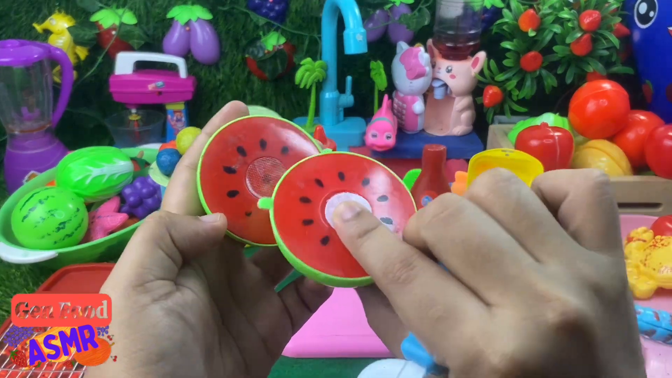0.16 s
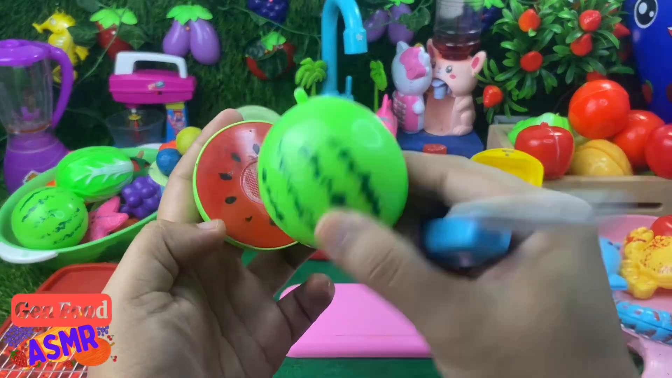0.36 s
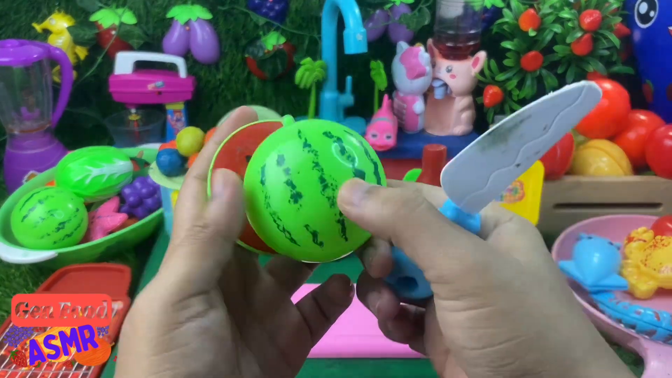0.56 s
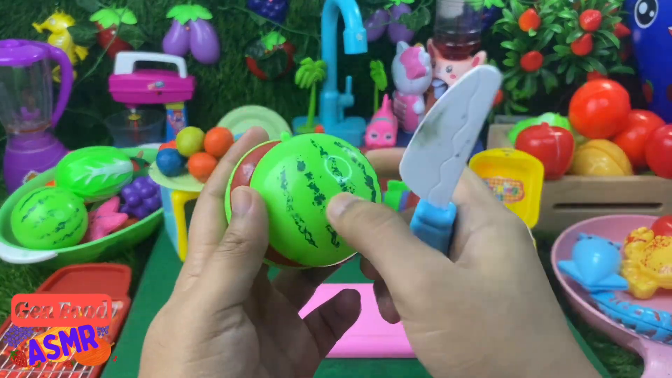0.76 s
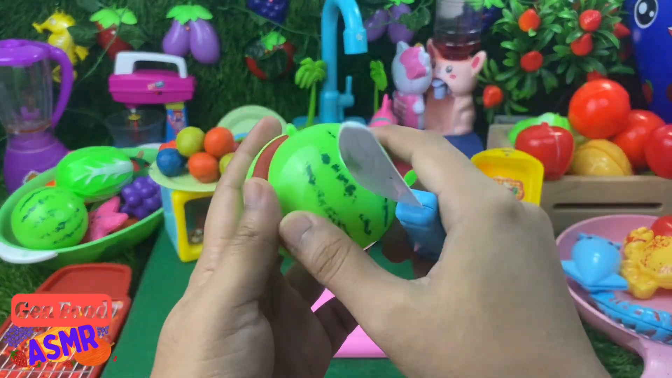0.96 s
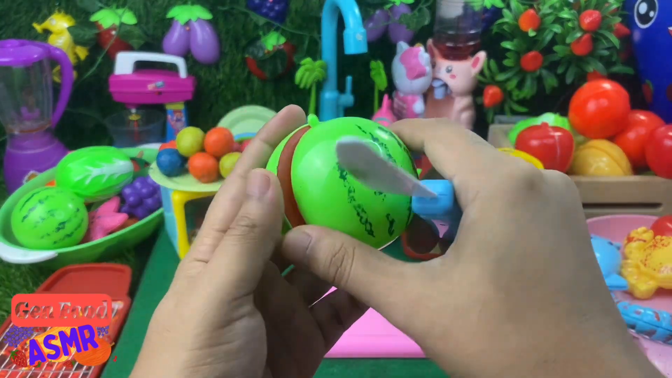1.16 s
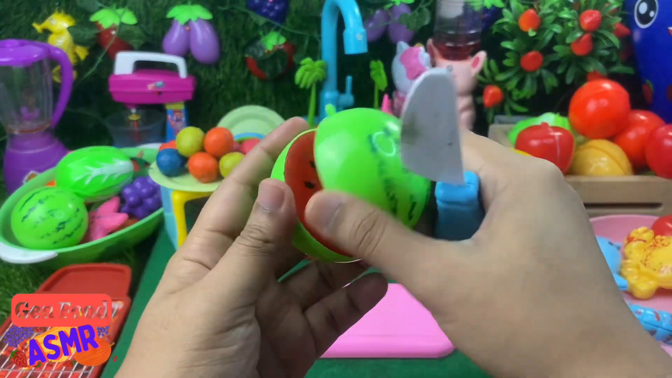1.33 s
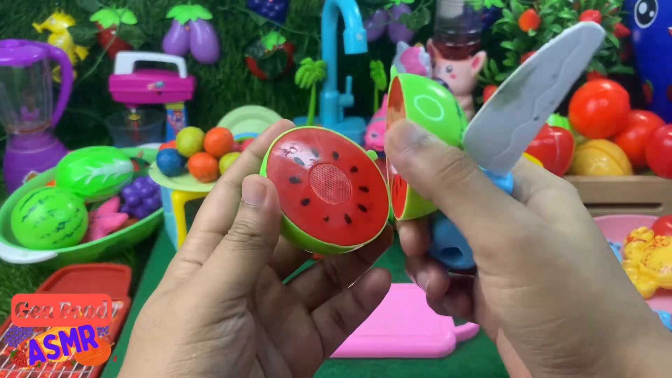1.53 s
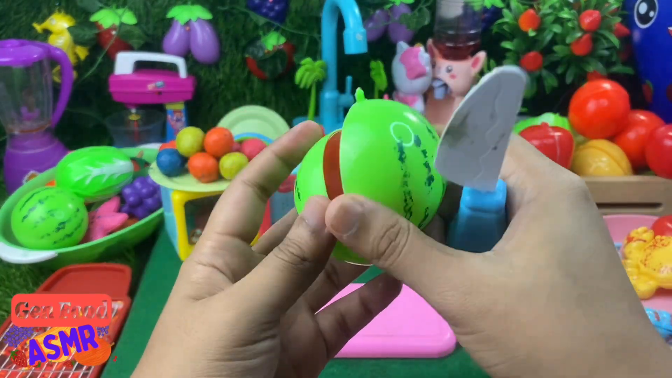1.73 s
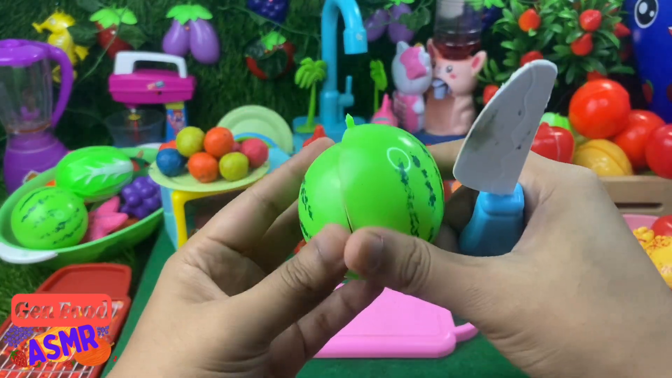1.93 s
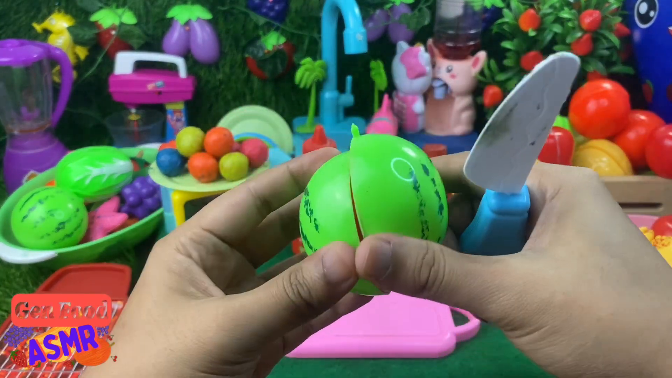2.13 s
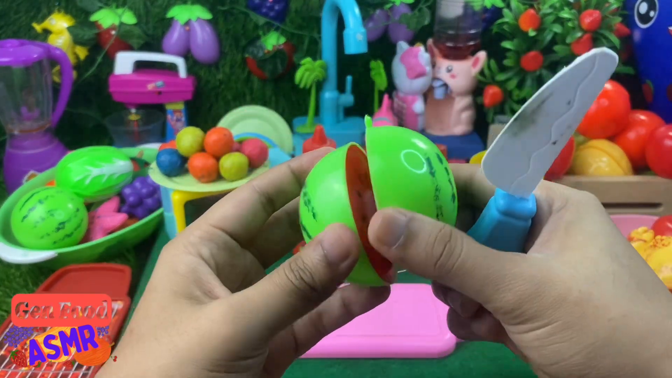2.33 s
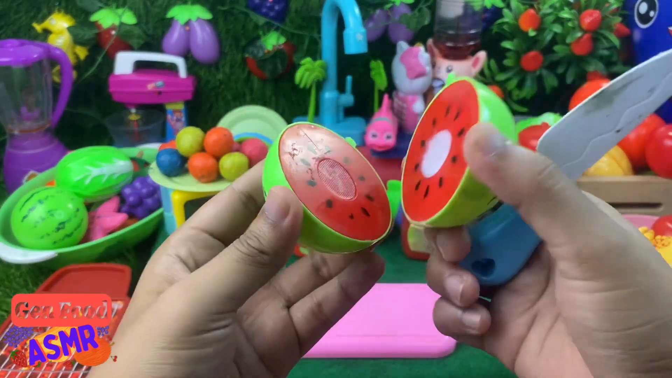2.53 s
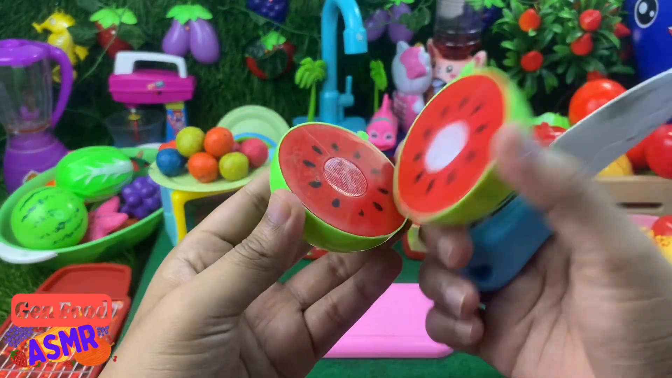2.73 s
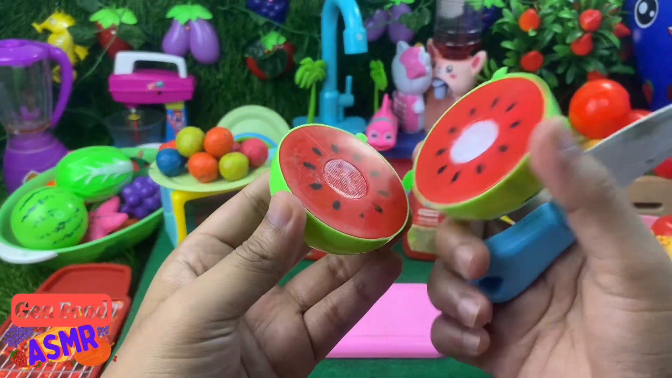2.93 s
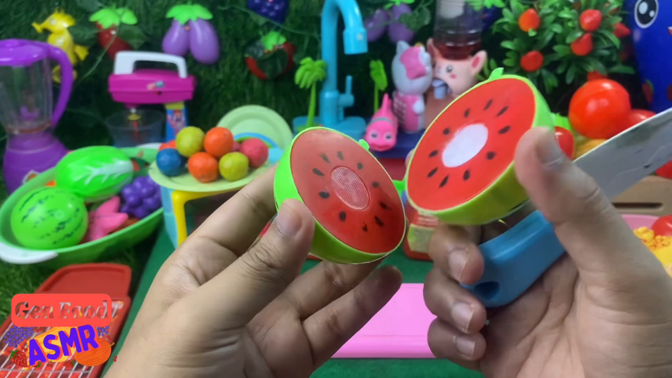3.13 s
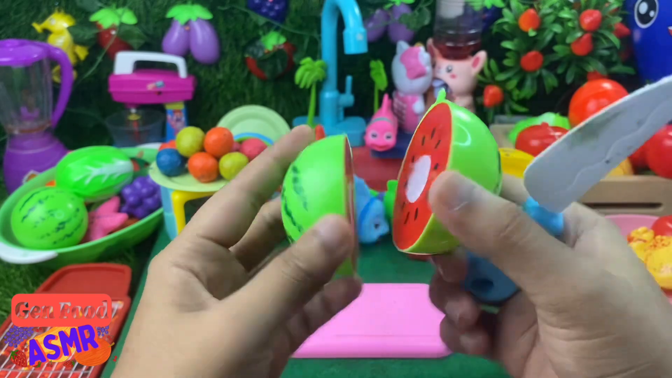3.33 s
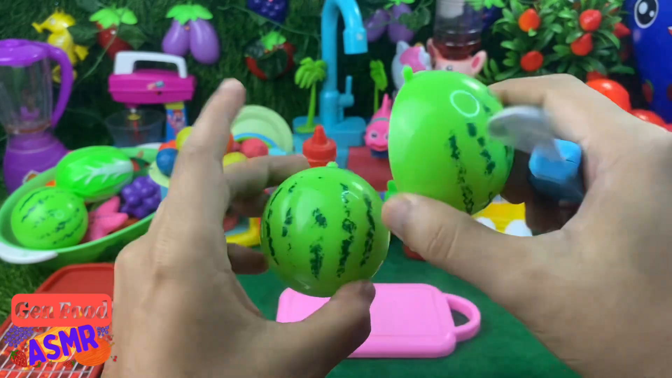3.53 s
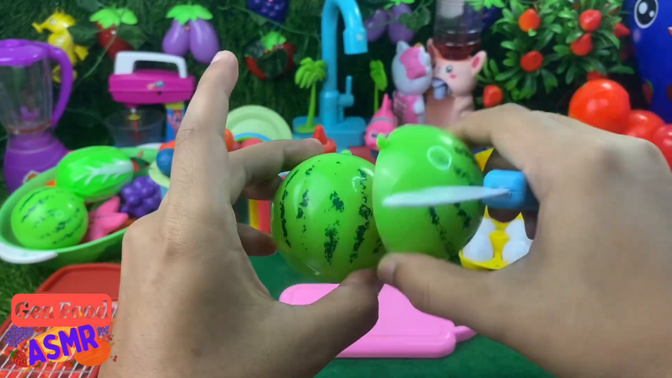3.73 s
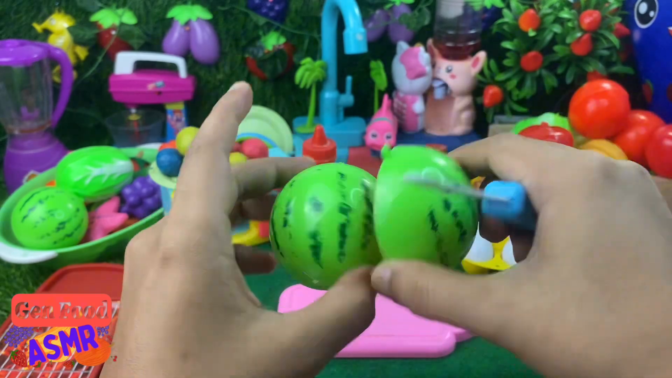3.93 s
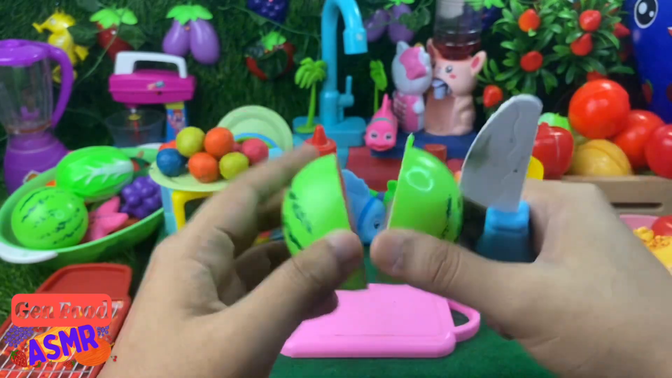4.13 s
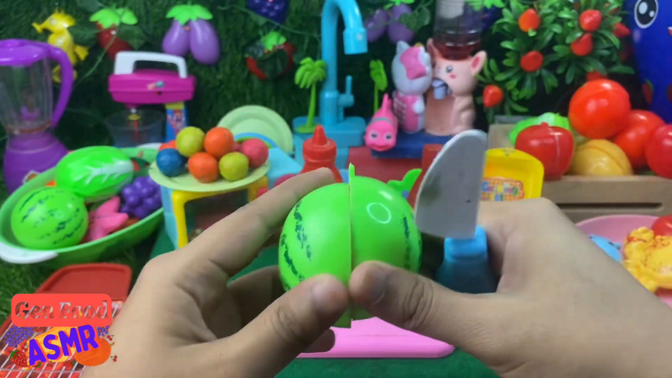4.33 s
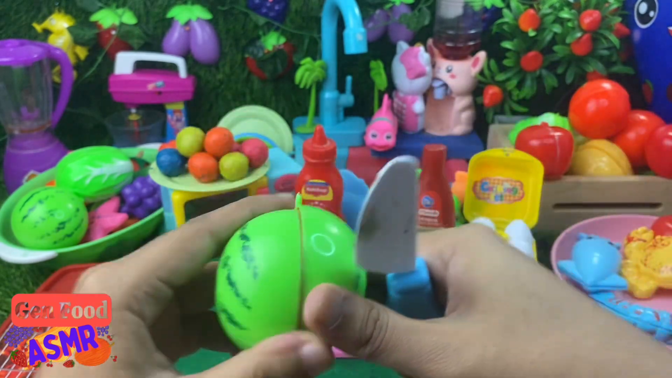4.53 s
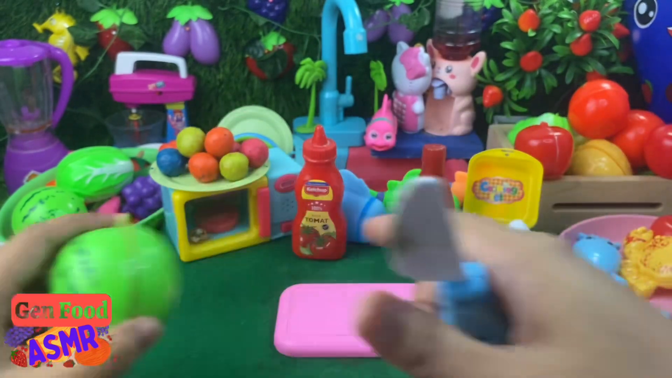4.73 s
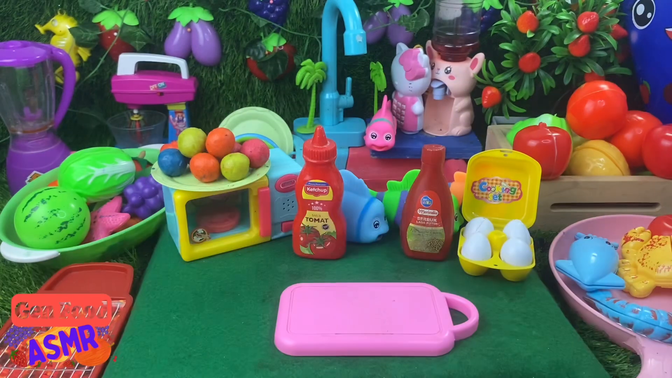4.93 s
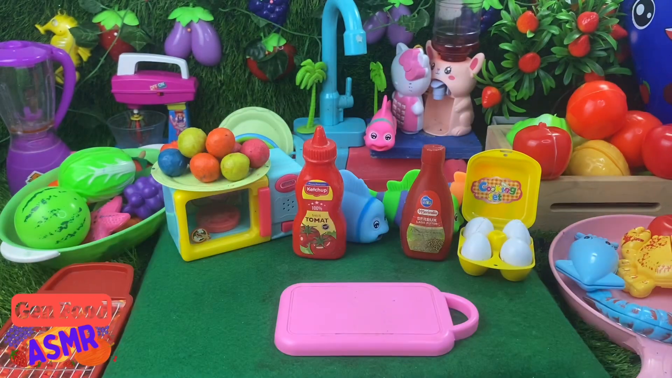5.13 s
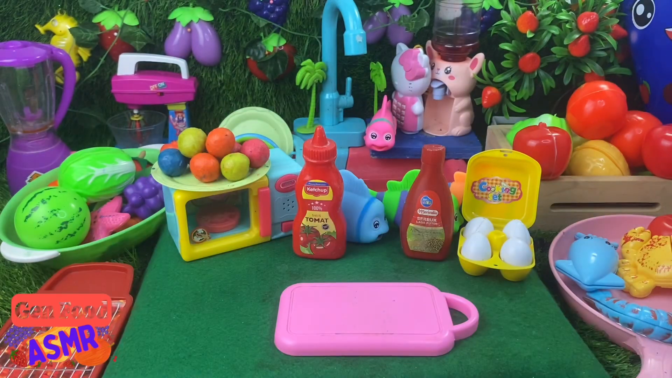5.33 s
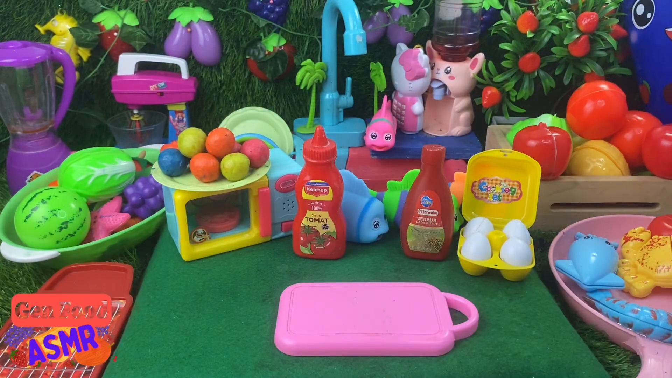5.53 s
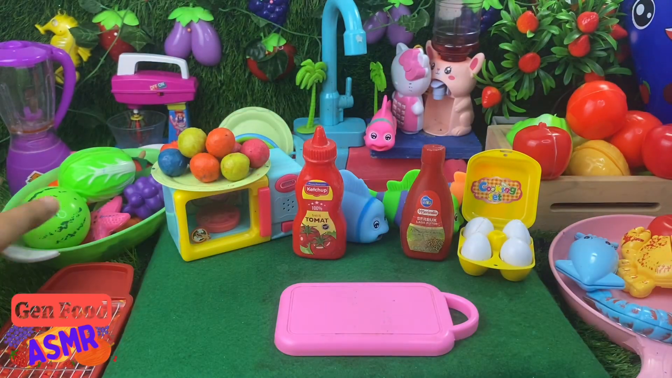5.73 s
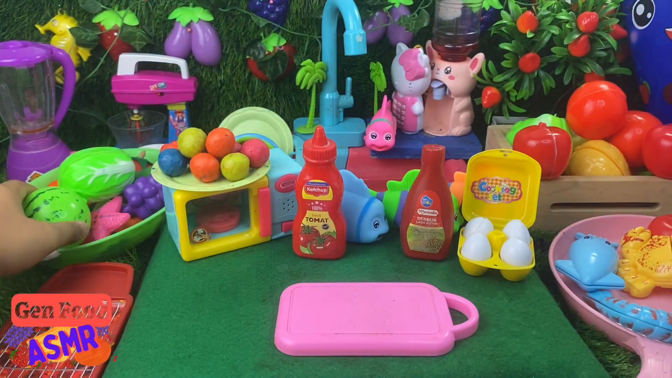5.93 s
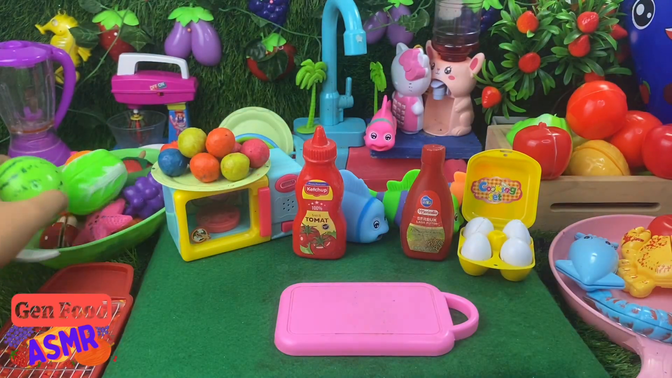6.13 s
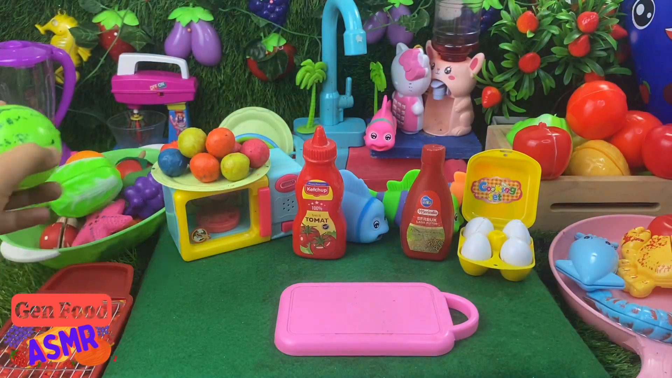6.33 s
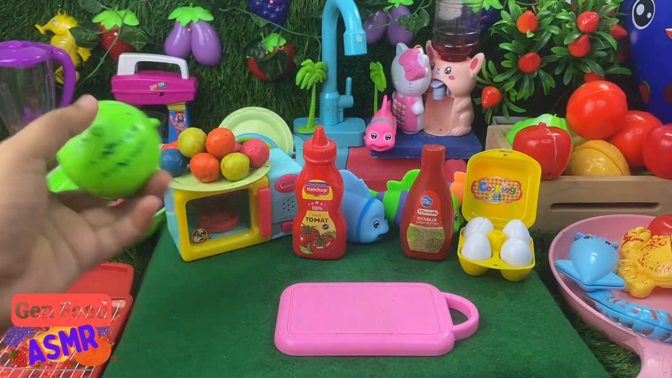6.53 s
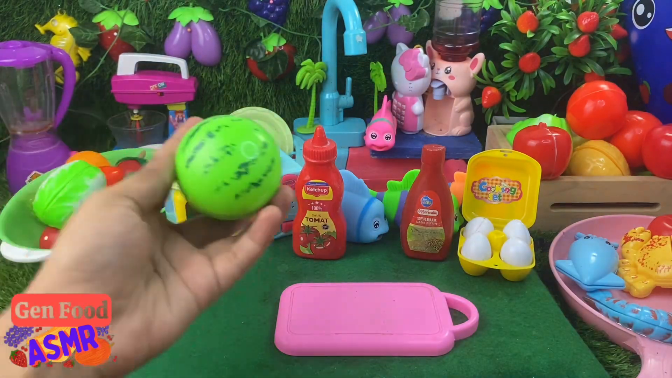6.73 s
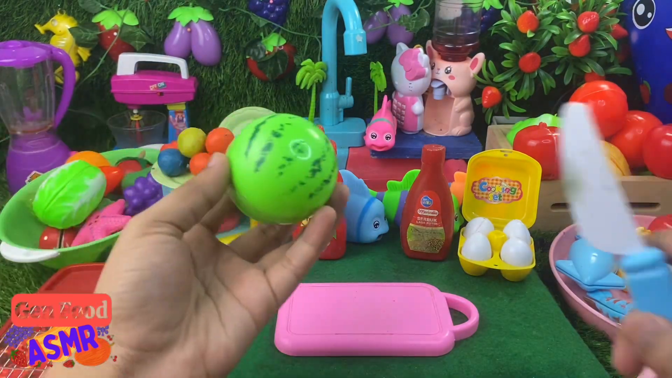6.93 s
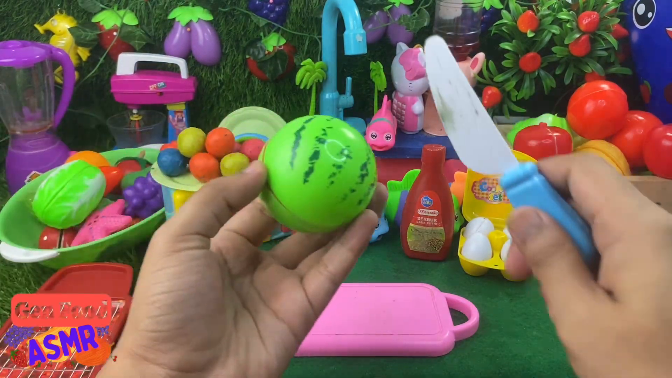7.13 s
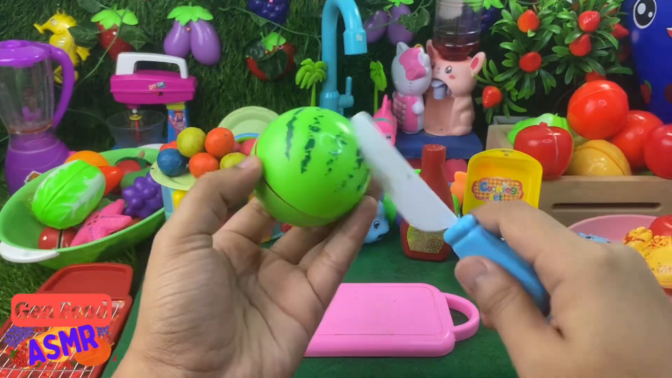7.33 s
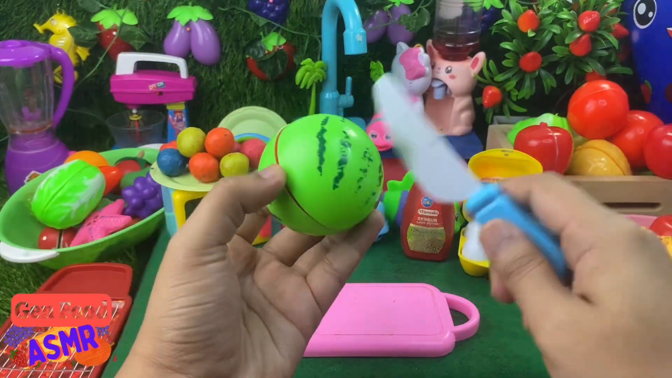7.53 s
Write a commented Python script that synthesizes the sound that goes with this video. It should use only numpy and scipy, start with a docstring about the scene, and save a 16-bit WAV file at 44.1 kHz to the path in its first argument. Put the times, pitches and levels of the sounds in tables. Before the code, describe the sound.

A close stereo microphone in a small furnished room picks up faint low rumble, slight hiss and a brush of skin. A hollow plastic toy melon clacks hard at 0.1 s and more lightly at 0.5 s, with soft scuffs after. Sparse hook clicks from 1.1 s lead to a short crackling fastener tear around 1.3 s. A modest knock comes at 1.7 s, then a sharper, denser rip at 2.2-2.4 s. Strong hollow clacks land at 2.75 and 2.95 s, a weaker one at 3.2, then 3.6 and a softer 3.8, with a click and scuff near 4.15 s. From 4.6 to 6 s it is quiet, only dull low table bumps and faint rubbing. Toys jostle softly in a plastic bowl around 6.0-6.1 s and again at 6.5 s. Two bright, hard knocks ring out at 7.2 and 7.55 s, with a light scuff between.

```python
"""A low rumble, faint hiss and a brush of skin, then at once hard knocks: hands work a hollow plastic toy melon.
They knock, press and pull its halves apart close to a two-port microphone; each knock rings shell and enclosed air.
Hook-and-loop pads tear in crackling bursts built from tiny blows to the same shell; rubbing is flickering noise.
Later come dull decaying bumps through the table, and toys jostling in a bowl: noise feeding the bowl's modes.
A small furnished room of fading noise bands answers the knocks and tears."""
import sys
import numpy as np
from scipy import signal
from scipy.fft import rfft, irfft, next_fast_len
from scipy.io import wavfile
from scipy.ndimage import uniform_filter1d

SR = 44100
rng = np.random.default_rng(int(sys.argv[2]) if len(sys.argv) > 2 else 0)


def master_out(mix):
    """Clip the mix to full scale and print it as 16-bit PCM to the path in sys.argv[1]."""
    frames = np.transpose(np.atleast_2d(mix))
    ceiling = np.clip(frames, -1, 1)
    pcm = np.round(ceiling * 32767).astype(np.int16)
    wavfile.write(sys.argv[1], SR, pcm)


N = 333396

# rumble swells and sags: (time [s], level [dB])
RUMBLE_LEVEL = [(0, -56), (.25, -59.5), (.95, -60.5), (1.3, -56), (1.8, -60.5), (2.7, -60), (3.75, -59),
                (4.27, -57), (4.55, -64.5), (4.8, -57), (5.1, -68.5), (5.45, -61.5), (5.59, -71.5),
                (5.7, -56.5), (5.85, -60), (6.27, -67), (6.7, -67), (7.2, -63.5), (7.43, -59.5),
                (7.56, -62)]
# rumble spectrum: (frequency [Hz], relative level per Hz [dB])
RUMBLE_COLOUR = [(12, -34), (20, -8), (48, -0.5), (74, 4.5), (95, -5.5), (173, -16), (400, -30.5),
                 (520, -57.5), (880, -120)]
# hiss spectrum: (frequency [Hz], relative level per Hz [dB])
HISS_COLOUR = [(150, -32), (250, -7), (7760, -27.5), (8930, -37), (11000, -22.5), (16500, -39)]
HISS_DB = -79.5

# skin sliding on plastic and cloth: (time [s], length [s], level [dB])
RUB_STROKES = [(0, 0.066, -59.5), (.31, 0.011, -77), (.41, 0.019, -65.5), (.47, 0.013, -74),
               (.72, 0.018, -64), (.84, 0.072, -71), (.965, 0.0092, -66), (1.02, .01, -73),
               (1.86, 0.013, -65), (2.03, 0.0068, -80), (2.14, 0.033, -71), (4.32, 0.11, -68),
               (4.51, .06, -75), (5.0, 0.066, -74), (5.165, 0.019, -78.5), (5.97, 0.12, -70),
               (6.36, 0.059, -72.5), (6.48, 0.027, -70.5), (6.76, 0.026, -74.5), (6.99, 0.023, -79)]
# rubbing spectrum: (frequency [Hz], relative level per Hz [dB])
RUB_COLOUR = [(300, -14.5), (900, -8), (2500, -11), (4000, -11.5), (7800, -13.5), (11000, -15.5),
              (16000, -25)]
RUB_EDGE_S = 0.023  # time constant of swell and fade
# toys jolted in a plastic bowl: (time [s], level [dB])
JOLTS = [(5.97, -59), (6.03, -56.5), (6.085, -43.5), (6.2, -64.5), (6.51, -45.5), (6.55, -48),
         (6.95, -78.5)]
JOLT_RISE_S, SETTLE_DB_PER_S = 0.0051, 108
TOY_HISS_DB = -14  # sliding toys, relative to the jolts

# hard plastic knocks: (time [s], hollow note [Hz], then levels as rms over 10 ms:
# hollow [dB], shell [dB], ribs [dB], edge [dB], thud [dB])
KNOCKS = [(0.091, 908, -24, -29.5, -38.5, -36, -53.5), (0.524, 920, -33, -35, -31, -38, -42),
          (1.496, 1370, -55, -59, -79, -85, -71), (1.539, 1480, -63, -64, -66.5, -73, -72),
          (1.716, 1424, -39, -39, -45.5, -48.5, -47.5), (2.74, 1325, -24.5, -31, -33, -36.5, -51.5),
          (2.955, 1104, -20, -29, -26.5, -35, -39), (3.194, 1473, -41, -61, -73, -68, -54),
          (3.612, 926, -26, -32, -35.5, -36, -39), (3.834, 859, -45.5, -44, -54, -55.5, -48),
          (4.144, 1560, -29.5, -40, -45, -47, -67), (4.546, 1800, -54.5, -63, -55, -54, -67),
          (5.96, 1290, -68.5, -66, -62, -61, -69), (6.264, 1760, -74.5, -59.5, -72, -78, -67),
          (6.511, 963, -46, -47, -51, -55.5, -55.5), (7.231, 1458, -23, -28, -32, -29.5, -44),
          (7.554, 1130, -23, -27, -31.5, -33.5, -41.5)]
# soft scuffs, faces sliding as they touch: (time [s], hollow note [Hz], then levels as rms over 10 ms:
# hollow [dB], shell [dB], ribs [dB], edge [dB], thud [dB])
SCUFFS = [(0.671, 795, -51.5, -57.5, -56, -62, -60), (0.93, 1430, -50, -86, -64, -64.5, -70),
          (4.184, 1320, -38.5, -44.5, -56, -61, -57.5), (4.313, 940, -55, -69, -66.5, -69.5, -61),
          (6.017, 1480, -53, -56, -71, -84, -68), (6.079, 950, -47.5, -49, -51, -54, -47.5),
          (6.091, 1494, -45, -43.5, -50.5, -58, -56), (6.214, 835, -67.5, -60.5, -69, -71, -58.5),
          (6.546, 746, -56, -60, -70, -80, -78), (6.584, 1300, -50, -51, -61, -66, -70),
          (7.335, 1380, -38, -58, -52, -53, -66)]
KNOCK_MS, SCUFF_MS = 2.4, 11  # how long the faces chatter
# modes of the plastic shell: (frequency [Hz], level [dB], t60 [s])
SHELL_MODES = [(1924, 6, 0.0093), (2240, 0, .01), (2470, -3, 0.012), (2663, -2, 0.011), (3020, -1.5, .014),
               (3404, -2.5, 0.012), (3690, -4.5, 0.015), (3970, -10, 0.017)]
# modes of the stiff ribs inside: (frequency [Hz], level [dB], t60 [s])
RIB_MODES = [(4230, -7.5, 0.011), (4670, -7.5, 0.012), (5180, -3.5, 0.0076), (5740, -2, 0.0048),
             (6320, -5.5, 0.0093), (6870, -6.5, 0.016), (7300, -9, 0.021), (7935, -1, 0.0076)]
# modes of the thin rim: (frequency [Hz], level [dB], t60 [s])
EDGE_MODES = [(8500, 3, 0.0023), (10020, 2.5, 0.0033), (10250, -2, 0.0068), (11080, -1.5, 0.0068),
              (11720, -2, 0.0067), (12500, -1, 0.006), (14400, -1, 0.0059), (15500, -1.5, .005)]
# modes of the round wall, joined to the hollow note: (frequency [Hz], level [dB], t60 [s])
BELLY_MODES = [(690, -14, 0.0047), (877, -9, 0.033), (1086, -19, 0.01), (1245, -2.5, 0.021),
               (1393, -8, 0.013), (1480, -5.5, 0.025)]
HOLLOW_T60_S, THUD_HZ, THUD_T60_S = .014, 420, .04
RADIATE_HZ = 970  # a small shell sends out little below this
HOLLOW_CUT = 0.5  # hollow low cut as a share of its note
PUSH_PER_MS = 0.5  # one firm push, divided by the chatter time in ms

# single hooks of the pad letting go: (time [s], reference level [dB], hollow rms re that level [dB])
SNAPS = [(1.12, -26.5, -22), (1.156, -37, -23), (1.233, -37, -25), (1.27, -40, -27), (1.274, -26, -27),
         (1.289, -26, -35), (1.295, -20.5, -19), (1.306, -20, -20.5), (1.315, -23.5, -21),
         (1.323, -21, -17.5), (1.334, -26, -20), (2.169, -26.5, -18.5), (2.177, -33.5, -15),
         (2.188, -37.5, -20.5), (2.27, -22, -16.5), (2.288, -17.5, -23), (2.342, -20, -25),
         (4.487, -40.5, -35), (4.52, -56, -25)]
# rows of hooks ripping together: (time [s], reference level [dB], length [ms])
RIPS = [(2.265, -19.5, 13.6), (2.281, -18, 8.1), (2.293, -19, 9.6), (2.309, -18, 13.6),
        (2.331, -17.5, 4.75), (2.343, -20, 4), (2.355, -19.5, 7)]
# the pad peeling: (time [s], length [s], crackle level before the face resonance [dB])
TEARS = [(1.287, 0.046, -42.5), (2.265, 0.11, -44)]
SNAP_MS, RIP_HOLLOW_DB, TEAR_EDGE_S = 0.84, -13, 0.0011
HOOKS_PER_S, HOOK_SCATTER_DB = 2000, 3
PAD_HOLLOW_HZ, PAD_CUT = 1350, .85  # the cupped hand leaves the pad less bass
FACE_HZ, FACE_Q, FACE_DB = 3250, 4, 3  # resonance of the flat face under the pad

# dull bumps through the table: (time [s], peak level [dB], frequency [Hz])
BUMPS = [(4.658, -40, 76.7), (4.786, -46, 93.2), (4.884, -46, 63), (5.284, -49, 51.3), (5.325, -38, 91),
         (5.371, -48, 126), (5.442, -44, 98.3), (5.5, -51, 88), (5.674, -44.5, 85.2), (5.748, -47.5, 113.2),
         (5.907, -46.5, 53.8), (5.951, -50, 109), (5.979, -54, 90)]
BUMP_T60_S = 0.12

# modes of the bowl: (frequency [Hz], level [dB], t60 [s])
BOWL_MODES = [(250, -2, 0.037), (332, 0.5, 0.048), (397, 7, 0.033), (521, -11, 0.059), (771.6, 2.5, 0.1),
              (951.5, 3.5, 0.053), (1360, 1.5, 0.035), (1577, 3, 0.035), (1760, 6, 0.031),
              (2040, 2.5, 0.011)]

# bands of the room's answer: (centre [Hz], t60 [s], level [dB], side re mid [ratio])
ROOM_BANDS = [(230, 0.26, -7, 0.23), (500, 0.47, -4.5, 0.27), (966, .5, -9.5, 0.39), (1960, .45, -7, 1),
              (3880, 0.44, -5.5, 0.3), (7500, 0.44, -10, 0.092), (14000, 0.16, -10, 0.31)]
ROOM_START_MS = 2.2
# phase between the ports: (frequency [Hz], left lead [radians])
PORT_LAG = [(200, .1), (600, .8), (1200, 1), (2500, 1.5), (4400, 1.3), (7000, .1), (9000, -3.1),
            (11000, -6.2), (13300, -9.4), (15500, -12.5)]
# balance between the ports: (frequency [Hz], left minus right [dB])
PORT_BALANCE = [(60, 0.0), (110, 0.5), (200, 1.5), (380, 1.0), (700, 4.0), (1290, 2.5), (2380, 4.0),
                (4400, 6.0), (8120, 1.0), (15000, 0.5)]
# the hands drift sideways: (time [s], extra left minus right [dB])
HANDS = [(0, 0.5), (2.4, 1.5), (2.8, 2.5), (3.6, -5.5), (4.3, 0.5), (6, -3.5), (7.3, 0)]
TOP_HZ = 16300


def undb(db):
    """Turns dB into an amplitude factor."""
    return 10 ** (np.asarray(db) / 20)


def rms(x):
    """Root-mean-square level."""
    return np.sqrt(np.mean(x ** 2))


def on_log(hz, table):
    """Reads (Hz, value) rows on a log-frequency axis."""
    rows = np.array(table, float)
    return np.interp(np.log(np.maximum(hz, 1)), np.log(np.maximum(rows[:, 0], 1)), rows[:, 1])


def on_time(table):
    """Draws straight lines between (s, value) rows."""
    rows = np.array(table, float)
    return np.interp(np.arange(N) / SR, rows[:, 0], rows[:, 1])


def noise(colour):
    """Random noise shaped to the given spectrum, at rms 1."""
    spectrum = rfft(rng.standard_normal(N))
    shape = undb(on_log(np.fft.rfftfreq(N, 1 / SR), colour))
    x = irfft(spectrum * shape, N)
    return x / rms(x)


def wide_noise(colour, side):
    """Noise shared by both ports, plus a weaker part in opposite polarity for width."""
    return noise(colour) + side * noise(colour) * np.array([[1], [-1]])


def walk(rate):
    """Wandering level: random steps, rate per second, smoothed into slopes."""
    k = int(SR / rate)
    steps = np.repeat(rng.standard_normal(N // k + 1), k)
    return uniform_filter1d(steps, k)[:N]


def ring(modes, scatter_db=0., size=2048):
    """Sum of decaying sine modes; each call draws new polarities and scatters their weights."""
    hz, db, t60 = np.array(modes, float).T[:, :, None]
    t = np.arange(size) / SR
    chance = rng.standard_normal((len(hz), 2))
    gain = undb(db + scatter_db * chance[:, :1]) * np.sign(chance[:, 1:])
    return np.sum(gain * np.sin(2 * np.pi * hz * t) * 1000. ** (-t / t60), axis=0)


def add(out, x, s):
    """Mixes x into out from time s."""
    i = int(s * SR)
    out[i:i + len(x)] += x[:N - i]


def strokes(table, edge_s):
    """Envelope of strokes: each swells, holds for its length and dies away."""
    t = np.arange(N) / SR
    envelope = 0
    for s, hold, db in table:
        outside = np.maximum(0, np.maximum(s - t, t - s - hold))
        envelope = envelope + undb(db) * np.exp(-outside / edge_s)
    return envelope


def air():
    """Rumble that swells and sags, nearly alike in both ports; hiss, unrelated between them."""
    rumble = wide_noise(RUMBLE_COLOUR, .17) * undb(on_time(RUMBLE_LEVEL) + 1.5 * walk(28))
    hiss = undb(HISS_DB) * np.array([noise(HISS_COLOUR), noise(HISS_COLOUR)])
    return rumble + hiss


def jolts():
    """Envelope of the toys: each jolt sets them going at once, then they settle at a steady dB rate."""
    t = np.arange(N) / SR
    power = 0
    for s, db in JOLTS:
        since = np.maximum(t - s, 0)
        rise = 1 - np.exp(-since / JOLT_RISE_S)
        power = power + (undb(db - SETTLE_DB_PER_S * since) * rise) ** 2
    return np.sqrt(power)


def rub():
    """Sliding skin and sliding toys: a grainy hiss that flickers."""
    press = strokes(RUB_STROKES, RUB_EDGE_S) + undb(TOY_HISS_DB) * jolts()
    return wide_noise(RUB_COLOUR, .45) * press * undb(2.5 * walk(60))


def blow(hollow_hz, hollow_db, shell_db, ribs_db, edge_db, thud_db, chatter_ms, cut=HOLLOW_CUT):
    """The faces meet in many quick touches that swell and thin out; they ring air, shell, ribs, rim and hand."""
    when, size = rng.random((2, 40))
    touches = np.zeros(SR // 20)
    span = np.clip(chatter_ms, .1, 45) * SR / 1000
    force = (2 * size - 1) * when * np.exp(-3.5 * when)
    np.add.at(touches, (when * span).astype(int), force)
    # one firm push a quarter of the way in, weaker the longer the touches last
    firm = np.arange(len(touches)) == int(.25 * span)
    push = touches + PUSH_PER_MS / chatter_ms * firm

    air_note = [(ratio * hollow_hz, db, HOLLOW_T60_S) for ratio, db in ((1, 4), (.82, -7), (1.17, -7))]
    thud = [(ratio * THUD_HZ, db, THUD_T60_S) for ratio, db in ((1, 0), (.8, -4), (1.45, -4))]
    # modes, level [dB], low cut [Hz], what drives them
    parts = ((air_note + BELLY_MODES, hollow_db, cut * hollow_hz, push),
             (SHELL_MODES, shell_db, RADIATE_HZ, touches),
             (RIB_MODES, ribs_db, 2200, touches),
             (EDGE_MODES, edge_db, 4000, touches),
             (thud, thud_db, 220, push))
    out = 0
    for modes, db, cut_hz, drive in parts:
        x = signal.fftconvolve(ring(modes, scatter_db=4.0), drive)
        x = signal.sosfilt(signal.butter(3, cut_hz, "high", fs=SR, output="sos"), x)
        level = np.sqrt(np.sum(x ** 2) / (SR // 100))  # all its energy, as rms over 10 ms
        out = out + undb(db) * x / level
    return out


def knocks():
    """Knocks and scuffs of the shell: short chatter strikes hard, long chatter scrapes."""
    out = np.zeros(N)
    for table, ms in ((KNOCKS, KNOCK_MS), (SCUFFS, SCUFF_MS)):
        for s, *voice in table:
            add(out, blow(*voice, ms), s)
    return out


def pad():
    """Loud hooks snap singly or in rows; between them many small ones crackle into the same shell."""
    out = np.zeros(N)
    loud = [(*row, SNAP_MS) for row in SNAPS]
    loud += [(s, db, RIP_HOLLOW_DB, ms) for s, db, ms in RIPS]
    for s, db, hollow_db, ms in loud:
        snap = blow(PAD_HOLLOW_HZ, hollow_db, -21.5, -21.0, -20.5, -39.5, ms, PAD_CUT)
        add(out, undb(db) * snap, s)

    lets_go = rng.random(N) < HOOKS_PER_S / SR
    strength = undb(HOOK_SCATTER_DB * rng.exponential(size=N))
    hooks = lets_go * strength * rng.choice([-1, 1], N)
    small_blow = blow(PAD_HOLLOW_HZ, -5.1, 0.5, -11.0, -8, -25.5, chatter_ms=.3, cut=PAD_CUT)
    crackle = signal.fftconvolve(hooks, small_blow)[:N]
    out = out + strokes(TEARS, TEAR_EDGE_S) * crackle / rms(crackle)
    face = signal.lfilter(*signal.iirpeak(FACE_HZ, FACE_Q, SR), out)
    return out + undb(FACE_DB) * face


def bumps():
    """Soft low blows: the push takes a few milliseconds, so the top stays dark."""
    out = np.zeros(N)
    for s, db, hz in BUMPS:
        modes = [(hz, 0, BUMP_T60_S),
                 (1.93 * hz, -6, 0.74 * BUMP_T60_S),
                 (2.87 * hz, -14, 0.38 * BUMP_T60_S)]
        x = ring(modes, size=8192)
        x = x * (1 - np.exp(-np.arange(len(x)) / (0.0044 * SR))) ** 2  # soft onset
        add(out, undb(db) * x / np.abs(x).max(), s)
    return out


def bowl():
    """Dense small touches keep the bowl's wall modes murmuring."""
    touches = rng.standard_normal(N) * undb(2.0 * walk(150))
    x = signal.fftconvolve(touches, ring(BOWL_MODES, size=4096))[:N]
    return jolts() * x / rms(x)


def room(dry):
    """Bands of noise, each fading at its own rate and spread over the ports in its own share."""
    size = int(.7 * SR)
    t, hz = np.arange(size) / SR, np.fft.rfftfreq(size, 1 / SR)
    tail = 0
    for centre, t60, db, spread in ROOM_BANDS:
        # long decays start lower, to keep their energy in check
        mid, side = rng.standard_normal((2, size)) / np.sqrt(SR * t60 / 14)
        pair = mid + spread * side * np.array([[1], [-1]])
        band = np.exp(-np.log2(np.maximum(hz, 1) / centre) ** 2 / .5)
        tail = tail + undb(db) * irfft(rfft(pair) * band, size) * 1000. ** (-t / t60)
    tail = tail * (1 - np.exp(-(t * 1000 / ROOM_START_MS) ** 2))  # the answer builds up softly
    return signal.fftconvolve(dry[None], tail, axes=1)[:, :N]


def ports(sound):
    """The housing gives the two ports a lag and a balance that depend on pitch."""
    size = next_fast_len(N + SR)
    hz = np.fft.rfftfreq(size, 1 / SR)
    # half the difference goes to the left, its inverse to the right
    half = np.exp(.5j * on_log(hz, PORT_LAG)) * undb(on_log(hz, PORT_BALANCE) / 2)
    return irfft(rfft(sound, size) * np.array([half, 1 / half]), size)[:, :N]


def scene():
    """Mixes the hands, the room's answer, rubbing, bowl, bumps and air."""
    # every wall faces another side of the shell and hears its modes weighted differently
    walls = sum(room(knocks() + pad()) for side in range(3)) / np.sqrt(3)
    drift = undb(on_time(HANDS) * np.array([[.5], [-.5]]))
    hands = ports(knocks() + pad()) * drift
    return hands + ports(walls + rub() + bowl()) + bumps() + air()


def record(dry):
    """The recorder cuts the top with a steep low-pass."""
    return signal.sosfilt(signal.ellip(10, .2, 80, TOP_HZ, fs=SR, output="sos"), dry)


dry = scene()
out = record(dry)
master_out(out)
```